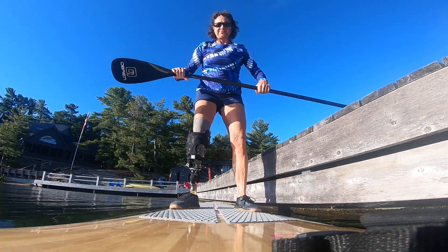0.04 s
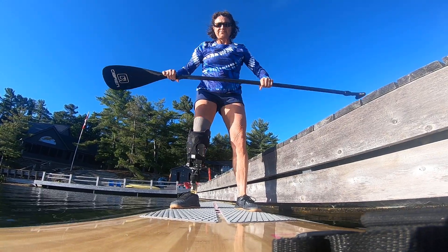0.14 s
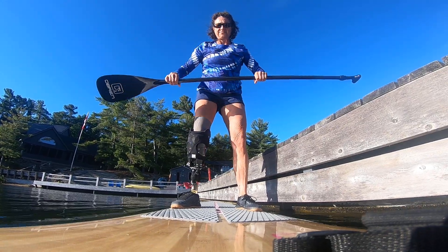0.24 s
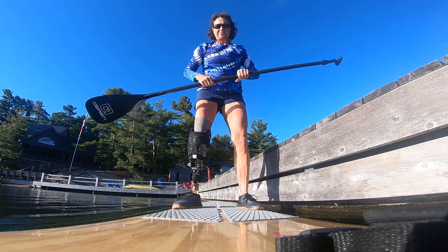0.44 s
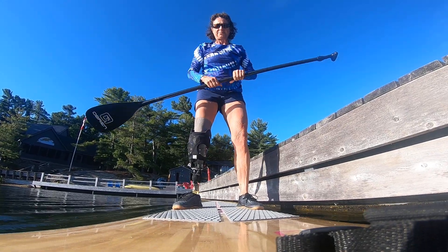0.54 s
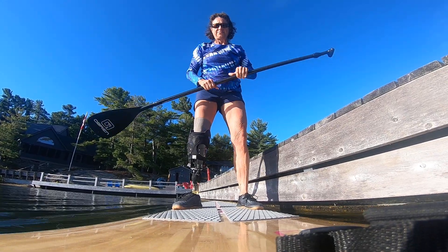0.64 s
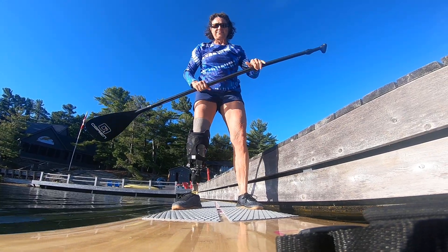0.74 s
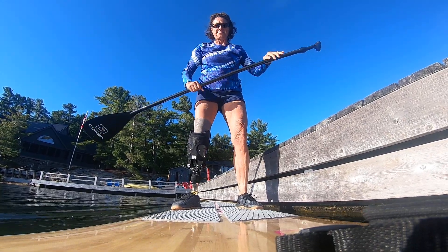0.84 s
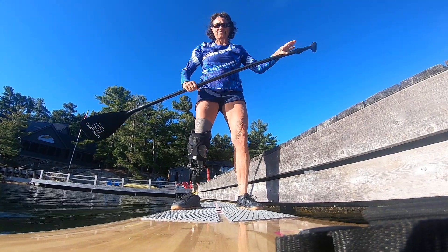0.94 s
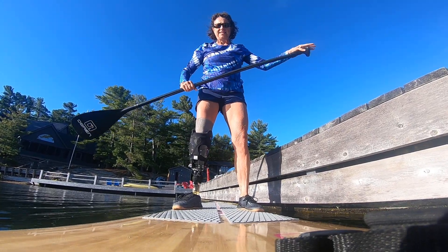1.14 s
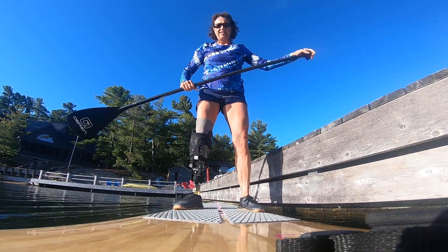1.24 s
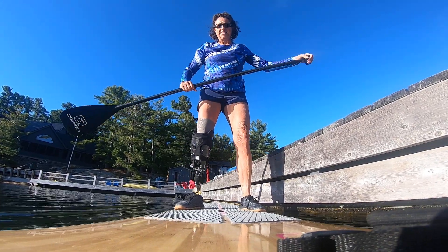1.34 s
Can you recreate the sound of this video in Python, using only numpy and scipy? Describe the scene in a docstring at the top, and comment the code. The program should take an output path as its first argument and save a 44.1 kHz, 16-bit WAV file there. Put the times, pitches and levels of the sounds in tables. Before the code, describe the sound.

Hollow knocks as a paddle clacks twice and a board bumps a wooden dock.

```python
"""On a quiet lake, a paddle board lies against a wooden dock, heard from the board's deck.
The paddle clacks twice, ringing briefly with each hit. Then the hollow board scuffs the dock
and booms in a quick cluster of bumps. Soft nudges make the dock's timbers hum, and faint
ticks follow, all over a low wash of water and air."""
import sys
import numpy as np
from scipy import signal
from scipy.fft import rfft, irfft
from scipy.io import wavfile
from scipy.ndimage import map_coordinates

SR = 44100
rng = np.random.default_rng(int(sys.argv[2]) if len(sys.argv) > 2 else 0)


def output_pcm(signal):
    """Save a mono or channel-first signal as 16-bit PCM at the path in sys.argv[1].

    Samples are clipped to [-1, 1] before scaling.
    """
    pcm = np.clip(np.atleast_2d(signal).T, -1, 1) * 32767
    wavfile.write(sys.argv[1], SR, np.round(pcm).astype(np.int16))


N = 61739
HIT_SAMPLES = SR // 2  # each hit gets half a second to ring out
HIT_TIME = np.arange(HIT_SAMPLES) / SR


def gain(db):
    """Turn decibels into a number to multiply by."""
    return 10 ** (np.asarray(db) / 20)


def curve_at(points, hz):
    """Read between (frequency, value) points, spaced the way we hear pitch."""
    freqs, values = np.transpose(points)
    return np.interp(np.log(hz + 1), np.log(freqs + 1), values)


def normalize(sound):
    """Scale a sound to an average power of 1."""
    return sound / np.sqrt(np.mean(sound ** 2) + 1e-20)


def pan(db):
    """Left and right gains; below 0 dB the right side is louder."""
    return gain(np.array([[db], [-db]]) / 2)


def wobble(per_second):
    """A smooth curve through this many random values a second."""
    return map_coordinates(rng.standard_normal(N), [np.arange(N) * per_second / SR + 2])


def shape_noise(white, colour, likeness, length=N):
    """Give two noises a tone colour and blend them into left and right."""
    hz = np.fft.rfftfreq(2 * length, 1 / SR)
    angle = np.arccos(np.clip(curve_at(likeness, hz), -1, 1)) / 2
    spectrum = rfft(white, 2 * length) * gain(curve_at(colour, hz))
    shared, opposite = irfft(spectrum * [np.cos(angle), np.sin(angle)])[:, :length]
    return np.array([shared + opposite, shared - opposite])


def noise(colour, likeness):
    """Steady stereo noise with the given tone colour."""
    return normalize(shape_noise(rng.standard_normal((2, 2 * N)), colour, likeness))


def soften(sound, corner_hz, slope):
    """Turn down the treble above corner_hz, as a softer hit would."""
    size = 2 * sound.shape[1]
    hz = np.fft.rfftfreq(size, 1 / SR)
    cepstrum = irfft(-np.log1p((hz / corner_hz) ** (2 * slope)) / 2)
    # Fold the filter forward in time, so nothing sounds before the hit.
    cepstrum[1:size // 2] *= 2
    cepstrum[size // 2 + 1:] = 0
    return irfft(rfft(sound, size) * np.exp(rfft(cepstrum)))[:, :size // 2]


def ring(tones, pitch=1):
    """A struck object's own tones, each dropping 60 dB over its fade time."""
    out = np.zeros((2, HIT_SAMPLES))
    for hz, db, fade_s, pan_db, left_lead in tones:
        wave = np.sin(2 * np.pi * hz * pitch * HIT_TIME + np.array([[left_lead], [0]]))
        onset = 1 - np.exp(-np.pi * hz * HIT_TIME)
        out += pan(pan_db) * gain(db - 60 * HIT_TIME / fade_s) * wave * onset
    return out


def add(out, start_s, sound):
    """Mix a sound in at its start time."""
    part = out[:, max(round(start_s * SR), 0):][:, :sound.shape[1]]
    part += sound[:, :part.shape[1]]


# Tone colour of the water and air (frequency [Hz], level [dB])
LAKE_COLOUR = [(15, -11.5), (40, 0.5), (90, -20), (150, -6), (200, -7), (260, -20), (380, -19), (550, -25),
               (800, -15), (1100, -25.5), (1700, -25), (2650, -37.5), (3400, -30.5), (4500, -39.5),
               (7500, -42), (9500, -46), (12500, -47.5), (15500, -61)]
# How alike its two sides are (frequency [Hz], likeness [1 same, -1 opposite])
LAKE_LIKENESS = [(40, .6), (150, 0.57), (400, -0.66), (1000, -0.78), (3000, -0.25), (8000, -0.07)]
def lake():
    """A quiet wash of water and air whose low part gently swells and sinks."""
    wash = noise(LAKE_COLOUR, LAKE_LIKENESS)
    low = soften(wash, corner_hz=400, slope=0.7)
    swell_db = 2.5 * wobble(per_second=18)
    return gain(db=-58) * pan(db=-1.5) * (wash + low * (gain(swell_db) - 1))


# Soft pushes against the dock (time [s], level [dB], build-up [s])
DOCK_NUDGES = [(.003, -45.5, 0.001), (0.246, -52, .01), (.33, -32.5, 0.0086), (.402, -45, 0.0039),
               (.725, -46, 0.0074), (.86, -53.5, 0.0072), (1.177, -37, 0.013), (1.237, -43, 0.0072)]
# The timbers' tones (frequency [Hz], level [dB], fade time [s], pan [dB], left lead [rad])
DOCK_TONES = [(41.3, -16.5, .3, -1, 1), (149.6, 3, 0.19, -0.5, 1.05), (230, -12.5, 0.2, -1.5, -0.3),
              (399, -13, 0.19, -8.5, 2.8)]
def dock():
    """Slow pushes make the timbers hum without a sharp start."""
    out = np.zeros((2, N))
    timbers = ring(DOCK_TONES)
    for start_s, db, rise_s in DOCK_NUDGES:
        push = 1 - np.exp(-HIT_TIME / rise_s)
        add(out, start_s, gain(db) * timbers * push)
    return out


# How alike left and right are on the deck (frequency [Hz], likeness [1 same, -1 opposite])
DECK_LIKENESS = [(50, 0.91), (200, 1), (350, -0.016), (700, -0.68), (1500, -0.25), (3400, .7), (6000, 1)]
def rattle(colour, fade_times, rise_s=0.0016):
    """Many weak tones blur into noise after a hit, each band fading at its own speed."""
    hz, t, bands = signal.stft(rng.standard_normal((2, HIT_SAMPLES)), SR, nperseg=512)
    fade = gain(-60 * t / curve_at(fade_times, hz)[:, None])
    fading = signal.istft(bands * fade, SR, nperseg=512)[1][:, :HIT_SAMPLES]
    tail = shape_noise(fading, colour, DECK_LIKENESS, HIT_SAMPLES)
    onset = 1 - np.exp(-HIT_TIME / rise_s)
    return normalize(tail * onset) / np.sqrt(HIT_SAMPLES)


# Hits of the paddle (time [s], level [dB], brightness [Hz], pitch [ratio])
PADDLE_CLACKS = [(0.2024, -22.5, 2000, .95), (0.2066, -27.5, 7460, 0.98), (.209, -32.5, 7000, 1.0),
                 (.2158, -50.5, 8500, 1.25), (0.2809, -36, 3000, 0.9), (0.2845, -18, 3690, 0.99),
                 (.294, -39.5, 3800, 1.02), (0.437, -41, 2000, 1.3), (.4505, -36.5, 2010, 1.1),
                 (.803, -53, 2130, 1.36), (1.1521, -51, 3520, 1.05), (1.1577, -51, 3560, 1.12),
                 (1.322, -56, 5430, 1)]
# The paddle's tones (frequency [Hz], level [dB], fade time [s], pan [dB], left lead [rad])
PADDLE_TONES = [(1014, -11, 0.023, -7.5, 0.95), (1279, -8.5, 0.014, -2, 1.6), (1487, 1.5, 0.022, -3, 1.3),
                (2126, -10, 0.04, -6, 1.3), (3140, -25.5, 0.048, -2, .1), (3424, -7, .026, -3, 0.56),
                (3500, -16, 0.024, 1.5, 0.085), (5200, -7, .012, 7.5, 2.9),
                (5940, -2.5, 0.0093, -12.5, 0.26), (6570, -3.5, 0.006, -9.5, 0.31)]
# Tone colour of its rattle (frequency [Hz], level [dB])
PADDLE_RATTLE = [(150, -25), (400, -4), (530, -12.5), (950, -8.5), (1150, -10.5), (1550, -1), (2150, -6.5),
                 (2600, -21), (3400, -12), (4200, -24.5), (7000, -19), (12000, -50.5)]
# How long that rattle lasts (frequency [Hz], fade time [s])
PADDLE_FADES = [(400, 0.54), (1500, 0.12), (3500, 0.063), (8000, .07)]
def paddle(contact_s=0.00066):
    """Hard, short clacks and faint ticks; each builds up while the paddle makes contact."""
    out = np.zeros((2, N))
    onset = 1 - np.exp(-HIT_TIME / contact_s)
    for start_s, db, bright_hz, pitch in PADDLE_CLACKS:
        tail = gain(db=9.5) * pan(db=-4) * rattle(PADDLE_RATTLE, PADDLE_FADES)
        clack = onset * (ring(PADDLE_TONES, pitch) + tail)
        add(out, start_s, gain(db) * soften(clack, bright_hz, slope=7.1))
    return out


def with_boom(rows, boom_db, below_hz=270):
    """Change the level of the low notes; a glancing knock on the edge barely wakes them."""
    return [(hz, db + boom_db * (hz < below_hz), *rest) for hz, db, *rest in rows]


# Bumps of the board (time [s], level [dB], brightness [Hz], boom [dB])
BOARD_BUMPS = [(0.2032, -43, 1150, -8.5), (0.2129, -43, 920, -4), (0.286, -42, 900, 1.5),
               (0.2962, -53, 480, 1.5), (0.4376, -38, 1390, -28.5), (0.446, -28, 773, -19),
               (0.4517, -30, 1073, -21), (0.4574, -29, 248, -2), (0.4641, -24, 900, -1),
               (0.4754, -28.5, 498, -1), (0.4943, -29.5, 187.6, -1), (0.5081, -17.5, 141, -0.5),
               (0.5168, -25.5, 120, -1), (.5233, -28.5, 628, -7), (0.528, -21, 136, 0.5),
               (.5368, -31.5, 303, -3), (.542, -32, 419, -4.5), (0.5722, -29, 106, 2.5),
               (0.581, -31, 123, -2), (0.5826, -42, 387, 1.5), (.591, -41, 548, -4.5),
               (.624, -30.5, 127.5, 2.5), (.655, -41.5, 300, 0.5), (0.6666, -36, 161, 4),
               (0.804, -43, 90, 2), (1.1758, -47, 198, -1), (1.191, -46.5, 222, 0), (1.323, -54.5, 700, -8)]
# The hollow board's tones (frequency [Hz], level [dB], fade time [s], pan [dB], left lead [rad])
BOARD_TONES = [(56.3, -13, 0.2, -4.5, -1), (82, -9.5, 0.21, -0.5, -0.03), (132.35, 0, 0.28, -0.8, 0.7),
               (172.2, 5, 0.061, -3.7, 1), (312.4, -3.5, 0.16, -11.5, 1), (385.3, 4.5, 0.14, -8.5, 3.5),
               (415, -8.5, 0.19, -7, 4), (490.1, -2.5, 0.11, -8, 3), (608.7, -17.5, 0.37, -6, 4.5),
               (801.4, -18, 0.13, -2.5, 1.5)]
# Tone colour of its rattle (frequency [Hz], level [dB])
BOARD_RATTLE = [(25, -16.5), (70, -5), (120, -5.5), (155, 7), (250, -11), (400, -2), (560, -12.5),
                (800, -10.5), (1200, -29), (3000, -51.5)]
# How long that rattle lasts (frequency [Hz], fade time [s])
BOARD_FADES = [(60, 0.17), (150, 0.44), (400, 0.19), (1000, 0.13)]
def board():
    """Every bump rings the hollow board; harder ones wake its higher tones and sound brighter."""
    out = np.zeros((2, N))
    for start_s, db, bright_hz, boom_db in BOARD_BUMPS:
        tail = gain(db=15) * pan(db=-0.5) * rattle(with_boom(BOARD_RATTLE, boom_db), BOARD_FADES)
        thump = ring(with_boom(BOARD_TONES, boom_db)) + tail
        add(out, start_s, gain(db) * soften(thump, bright_hz, slope=2.18))
    return out


# Rubs of the board along the dock (time [s], hold [s], level [dB])
SCUFF_STROKES = [(0.4348, 0.0026, -41.5), (.45, 0.025, -46.5), (1.148, 0.0075, -60.5), (1.175, .012, -63.5),
                 (1.317, .009, -64), (1.349, 0.0093, -68)]
# Tone colour of the rubbing (frequency [Hz], level [dB])
RUB_COLOUR = [(200, -14), (500, -2), (750, 10), (1150, -2), (1600, 6.5), (2050, -0.5), (2600, -24),
              (3400, -9.5), (4200, -49), (8000, -40.5), (12000, -79.5)]
def scuffs(rise_s=0.0015, fall_db_per_s=432, grain_db=3):
    """The board's edge rubs the planks: grainy noise that rises, holds, then fades."""
    t = np.arange(N) / SR
    loudness = np.zeros(N)
    for start_s, hold_s, db in SCUFF_STROKES:
        onset = np.clip((t - start_s) / rise_s, 0, 1)
        fall_db = fall_db_per_s * np.maximum(t - start_s - hold_s, 0)
        loudness += onset * gain(db - fall_db)
    rub = noise(RUB_COLOUR, DECK_LIKENESS)
    grain = gain(grain_db * wobble(per_second=450))
    return loudness * pan(db=-2) * normalize(rub * grain)


def scene():
    """Paddle, board and dock over the wash of the lake."""
    return paddle() + board() + dock() + scuffs() + lake()


def record(dry):
    """Cut away the very highest treble."""
    hz = np.fft.rfftfreq(2 * N, 1 / SR)
    return irfft(rfft(dry, 2 * N) * (hz < 15700))[:, :N]


dry = scene()
out = record(dry)
output_pcm(out)
```